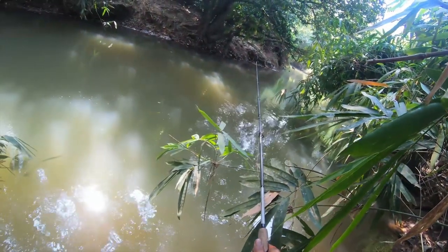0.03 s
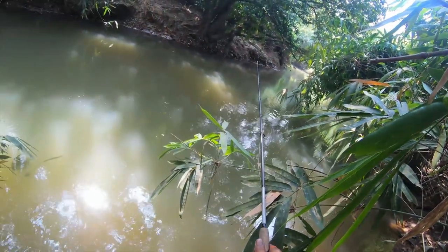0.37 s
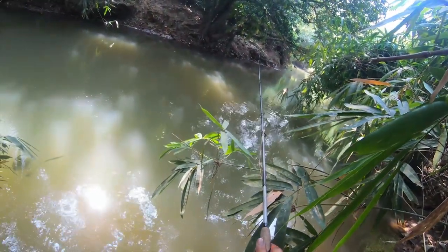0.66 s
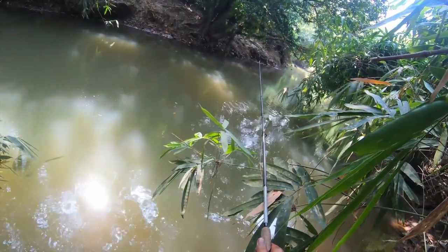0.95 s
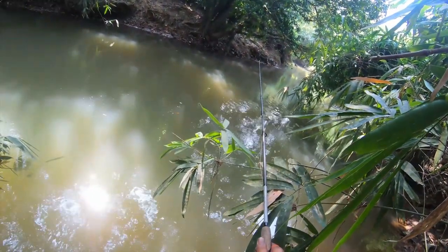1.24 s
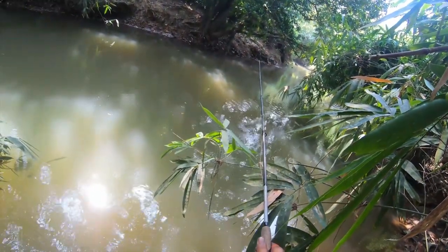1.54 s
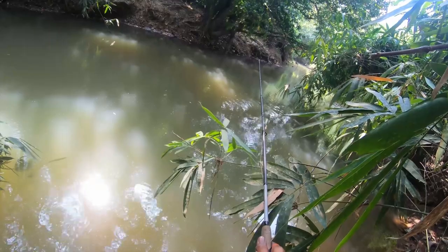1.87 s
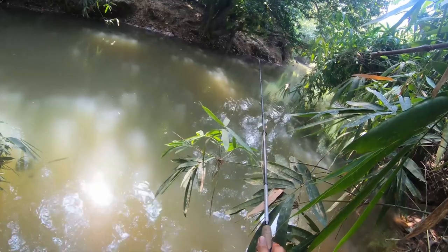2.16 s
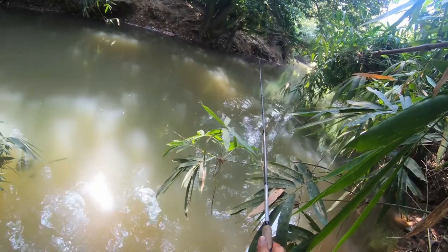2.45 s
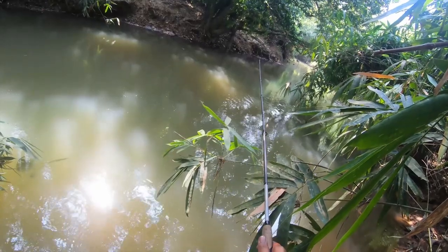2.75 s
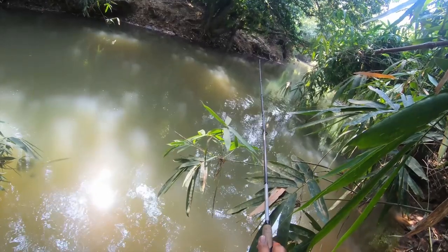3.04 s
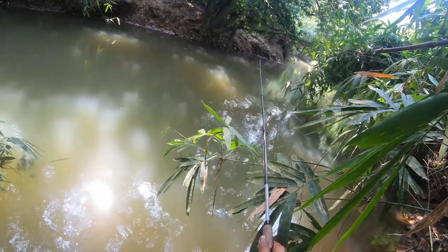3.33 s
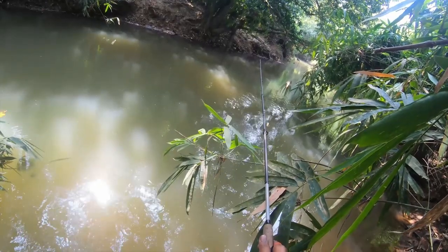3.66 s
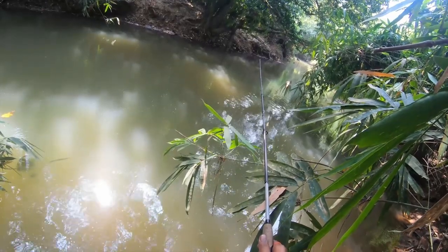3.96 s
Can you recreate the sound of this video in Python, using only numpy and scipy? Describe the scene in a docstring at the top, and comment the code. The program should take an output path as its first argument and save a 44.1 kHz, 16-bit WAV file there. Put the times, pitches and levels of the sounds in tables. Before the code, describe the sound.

Low, clear hooting from a bird comes in regular short phrases with a light outdoor echo. Behind it are a softly bubbling stream and thin far chirps; later a small bird whistles once and a leaf briefly rustles.

```python
"""A forest stream. A bird repeats a four-note hoot in nearly pure tones: two low notes, a loud held
one, a closing slur. The banks and trees throw every note back. A small bird gives one two-voiced
falling whistle, others chirp thinly far off, and a leaf rustles once. Under it all the water
washes as shaped noise and gurgles with ringing bubbles, over a low rumble of air."""
import sys
import numpy as np
from scipy import signal
from scipy.fft import rfft, irfft
from scipy.io import wavfile
from scipy.ndimage import uniform_filter1d

SR = 44100
rng = np.random.default_rng(int(sys.argv[2]) if len(sys.argv) > 2 else 0)


def generate_wav(sig):
    """Save sig (samples, or channels by samples) to the path in sys.argv[1] as 16-bit PCM at SR."""
    pcm = np.round(np.clip(np.atleast_2d(sig).T, -1, 1) * 32767).astype(np.int16)
    wavfile.write(sys.argv[1], SR, pcm)


N = 176400

# Wash spectrum. Each row: frequency in Hz, relative density in dB.
WASH_SPECTRUM = [(20, -28), (38, -16.5), (60, -6), (78, -3.5), (95, -5), (117, -15.5), (150, -2), (172, 0),
                 (215, -4), (400, -6.5), (700, -6), (950, -8), (1600, -11), (2700, -14), (4000, -19),
                 (5600, -26.5), (8500, -28), (10200, -40), (11500, -52.5)]
# Wash width. Each row: frequency in Hz, left-right correlation.
WASH_CORRELATION = [(60, .88), (150, 0.94), (280, 0.93), (540, 0.66), (1100, 0.15), (2400, .5), (5000, 0.5),
                    (10000, 0.15)]
# Wash balance. Each row: frequency in Hz, left minus right in dB.
WASH_PAN = [(60, 0), (200, 0), (330, 0), (600, 3), (1050, 7), (1900, 2.5), (3300, 1), (5800, 4),
            (10000, -4.5)]
# Rumble envelope. Each row: time in seconds, gain in dB.
RUMBLE_GAIN = [(0, 2), (0.599, -3), (1.2, -4), (1.53, 4), (1.72, -8.5), (1.88, 3), (2.15, -9), (2.45, 0),
               (2.7, -5.5), (4, -4.5)]
WASH_DB, PATCH_DB, FLICKER_DB, GUST_DB, RUMBLE_HZ = -47, 0.79, 0.35, 3.5, 113
BUBBLES_PER_S, BUBBLES_DB, BUBBLE_DECAY_CYCLES, BUBBLE_SPREAD_DB = 260, -63.5, 5.6, 3
RUSTLE_START_S, RUSTLE_DECAY_S, RUSTLE_HZ, RUSTLE_WIDTH_HZ, RUSTLE_DB = 3.656, .03, 9300, 1300, -58

# Far chirps. Each row: start in seconds, length in seconds, pitch in Hz,
# fall as a share of pitch (negative rises), level in dB.
FAR_CHIRPS = [(.46, 0.054, 7250, 0.043, -69), (.5, 0.056, 6550, 0.068, -66),
              (1.325, 0.076, 6820, 0.051, -66), (3.845, .11, 6880, -0.076, -67.5)]
# Whistle contour. Each row: time in seconds, upper voice in Hz, lower voice in Hz,
# overall gain in dB, extra gain in dB for partials involving the lower voice.
WHISTLE_CONTOUR = [(2.549, 5250, 1932, -52, -44), (2.583, 5210, 1960, -47, -13),
                   (2.617, 5190, 1950, -39, -12.5), (2.656, 5210, 1858, -43.5, 2),
                   (2.709, 5087, 1773, -38, -3.5), (2.75, 4940, 1770, -40.5, -3),
                   (2.786, 4673, 1727, -34.5, -12.5), (2.81, 4690, 1740, -47.5, -18),
                   (2.83, 4830, 1740, -66, -30)]
# Whistle partials. Each row: multiple of the upper voice, multiple of the lower voice.
WHISTLE_PARTIALS = [(1, 0), (0, 1), (0, 2), (0, 3), (1, 1), (1, 2), (2, 0)]
# Partial weights. Each entry: relative level in dB, in the same order.
PARTIAL_DB = [-1, -16, -7, -18, -6.5, -19, -33]

# Low hoots. Each row: start in seconds, length in seconds, pitch in Hz, nominal level in dB,
# fall as a share of pitch.
LOW_HOOTS = [(-.035, 0.063, 1059, -39, 0.12), (0.098, .052, 1041, -38, 0.16),
             (0.899, 0.049, 1034, -39.5, 0.13), (1.033, .048, 1034, -37.5, 0.13),
             (1.837, 0.056, 1034, -40.5, 0.042), (1.988, 0.039, 1036, -36.5, 0.16),
             (2.777, 0.035, 1035, -40.5, 0.015), (2.927, .046, 1014, -37, 0.2),
             (3.756, 0.054, 1042, -38, 0.047), (3.896, 0.053, 1034, -37, 0.14)]
# Held hoots. Each row: start in seconds, length in seconds, pitch in Hz, nominal level in dB.
HELD_HOOTS = [(0.151, 0.069, 1241, -27.5), (1.12, 0.062, 1241, -27.5), (2.06, 0.0626, 1229, -24.5),
              (3.001, .059, 1201, -25.5)]
# Closing slurs. Each row: start in seconds, length in seconds, pitch in Hz, nominal level in dB.
CLOSING_SLURS = [(0.285, 0.074, 1240, -38.5), (1.256, 0.072, 1236, -38), (2.189, 0.068, 1221, -37),
                 (3.137, 0.072, 1221, -38.5)]
ATTACK_S, RELEASE_S, OCTAVE_DB, WAVER_SHARE = .011, .012, -28.5, 0.0038

# Bank reflections. Each row: delay in seconds, left gain, right gain.
BANK_ECHOES = [(0.014, 0.23, 0.2), (0.036, 0.56, -0.3), (0.044, 0.22, 0.22), (.078, 0.11, 0.19)]
HOOT_T60_S, TREBLE_T60_S, TAIL_BUILD_S = 0.41, 0.64, 0.0035
HOOT_CORRELATION, TREBLE_CORRELATION = 0.45, .05  # left-right, of the tails
LATE_DB, LATE_T60_S = -12, 1.72  # echo from deeper in the trees
CUTOFF_HZ = 10900


def amp(db):
    """Decibels to gain."""
    return 10 ** (np.asarray(db) / 20)


def unit_rms(x):
    """Scales to rms 1."""
    return x / np.sqrt(np.mean(x ** 2) + 1e-20)


def log_interp(points, hz):
    """Reads a table on a log-frequency axis."""
    points_hz, value = np.transpose(points)
    return np.interp(np.log(hz + 1), np.log(points_hz + 1), value)


def add(mix, start_s, sound):
    """Mixes a sound in, cropped to the mix."""
    at = round(start_s * SR)
    sound = sound[max(-at, 0):]
    part = mix[max(at, 0):][:len(sound)]
    part += sound[:len(part)]


def wander(count, width=300):
    """Noise smoothed over width samples, rms about 1."""
    noise = rng.standard_normal(max(count, SR))
    return unit_rms(uniform_filter1d(uniform_filter1d(noise, width), width))[:count]


def forest(x, wet_db, t60_s, pan_db=0, correlation=HOOT_CORRELATION):
    """Direct sound, echoes off the banks, a diffuse tail from the trees. Positive pan is left."""
    t = np.arange(SR) / SR
    left, other = rng.standard_normal((2, SR))
    right = correlation * left + np.sqrt(1 - correlation ** 2) * other
    fade = amp(-60 * t / t60_s) + amp(LATE_DB - 60 * t / LATE_T60_S)
    tail = np.array([left, right]) * fade * (1 - np.exp(-t / TAIL_BUILD_S))
    paths = amp(wet_db) * tail / np.linalg.norm(tail[0])
    paths[:, 0] += 1
    for delay_s, *gains in BANK_ECHOES:
        paths[:, round(delay_s * SR)] += gains
    return signal.fftconvolve(x[None], paths, axes=1)[:, :N] * amp([[pan_db / 2], [-pan_db / 2]])


def note(length_s, hz, db, fall=0, arch=0, swell_db=0, jitter=0):
    """A tone with a faint octave. Fall, arch and jitter are shares of the pitch."""
    t = np.arange(0, length_s, 1 / SR)
    progress = t / length_s
    contour = 1 - fall * (progress - .5) + arch * (np.sin(np.pi * progress) - 2 / np.pi)
    waver = WAVER_SHARE * wander(len(t)) + jitter * wander(len(t), width=150)
    phase = 2 * np.pi * np.cumsum(hz * (contour + waver)) / SR
    ramp = np.clip(np.minimum(t / ATTACK_S, (length_s - t) / RELEASE_S), 0, 1)
    envelope = np.sin(np.pi / 2 * ramp) ** 2 * amp(db + swell_db * (progress - 1.5))
    return np.sqrt(2) * envelope * (np.sin(phase) + amp(OCTAVE_DB) * np.sin(2 * phase))


def stream():
    """Water noise with drifting spectral patches; its bass swells and sinks as a rumble of air."""
    frames, hz = N // 1024 + 5, np.fft.rfftfreq(4096, 1 / SR)
    left_re, left_im, other_re, other_im, patches = rng.standard_normal((5, frames, len(hz)))
    patches = unit_rms(uniform_filter1d(uniform_filter1d(patches, size=3, axis=0), size=32, axis=1))
    correlation = log_interp(WASH_CORRELATION, hz)
    left = left_re + 1j * left_im
    right = correlation * left + np.sqrt(1 - correlation ** 2) * (other_re + 1j * other_im)
    pan = amp(log_interp(WASH_PAN, hz) / 2)
    spectra = np.array([left * pan, right / pan]) * amp(log_interp(WASH_SPECTRUM, hz) + PATCH_DB * patches)
    _, wash = signal.istft(spectra.transpose(0, 2, 1), nperseg=4096, noverlap=3072)
    wash = amp(WASH_DB) * unit_rms(wash[:, :N])
    bass = irfft(rfft(wash) / (1 + (np.fft.rfftfreq(N, 1 / SR) / RUMBLE_HZ) ** 8), N)
    bass_db = np.interp(np.arange(N) / SR, *np.transpose(RUMBLE_GAIN)) + GUST_DB * wander(N, width=2500)
    return (wash - bass) * amp(FLICKER_DB * wander(N, width=2000)) + bass * amp(bass_db)


def bubbles():
    """Small bubbles ring briefly, rising in pitch, where the water ripples."""
    t, out = np.arange(3000) / SR, np.zeros((2, N))
    pitches_hz = np.geomspace(380, 3600, 30)
    for hz in pitches_hz:
        age = t * hz / BUBBLE_DECAY_CYCLES
        envelope = np.exp(-age) * (1 - np.exp(-t * hz)) / hz ** 0.12
        ring = envelope * np.sin(2 * np.pi * hz * t * (1 + 0.024 * age))
        strength = amp(BUBBLE_SPREAD_DB * np.minimum(rng.exponential(1, N), 4))
        onsets = rng.random(N) < BUBBLES_PER_S / len(pitches_hz) / SR
        pan_db = 1 + 4 * rng.standard_normal(N)  # ripples lie to the left
        out += signal.oaconvolve(strength * onsets * amp([pan_db, -pan_db]), ring[None], axes=1)[:, :N]
    return amp(BUBBLES_DB) * unit_rms(out)


def leaf():
    """One brush of a leaf: a short burst of bright noise."""
    band = np.exp(-.5 * ((np.fft.rfftfreq(N, 1 / SR) - RUSTLE_HZ) / RUSTLE_WIDTH_HZ) ** 2)
    hiss = unit_rms(irfft(rfft(rng.standard_normal((2, N))) * band, N))
    age_s = np.maximum(np.arange(N) / SR - RUSTLE_START_S, 0)
    return amp(RUSTLE_DB) * hiss * np.minimum(age_s / .004, 1) * np.exp(-age_s / RUSTLE_DECAY_S)


def far_birds():
    """Thin, high gliding chirps among the trees."""
    out = np.zeros(N)
    for start_s, length_s, hz, fall, db in FAR_CHIRPS:
        add(out, start_s, note(length_s, hz, db, fall))
    return forest(out, wet_db=4.5, t60_s=TREBLE_T60_S, pan_db=3, correlation=TREBLE_CORRELATION)


def whistling_bird():
    """Two voices sound together and make sum tones as they fall."""
    times_s, upper_hz, lower_hz, gain_db, lower_db = np.transpose(WHISTLE_CONTOUR)
    t = np.arange(times_s[0], times_s[-1], 1 / SR)
    upper_hz = np.interp(t, times_s, upper_hz) * (1 + 0.0072 * wander(len(t), width=80))
    lower_hz = np.interp(t, times_s, lower_hz) * (1 + 0.026 * wander(len(t), width=80))
    upper_phase, lower_phase = 2 * np.pi * np.cumsum([upper_hz, lower_hz], axis=1) / SR
    lower_gain = amp(np.interp(t, times_s, lower_db))
    voice = sum(amp(db) * (lower_gain if k else 1) * np.sin(j * upper_phase + k * lower_phase)
                for (j, k), db in zip(WHISTLE_PARTIALS, PARTIAL_DB))
    envelope = amp(np.interp(t, times_s, gain_db)) * np.minimum((t - t[0]) / ATTACK_S, 1)
    out = np.zeros(N)
    add(out, t[0], voice * envelope)
    return forest(out, wet_db=5, t60_s=TREBLE_T60_S, correlation=TREBLE_CORRELATION)


def hooting_bird():
    """Phrases of swelling tones: two low notes, a held note, a closing slur."""
    low, held, slur = np.zeros((3, N))
    for start_s, *row in LOW_HOOTS:
        add(low, start_s, note(*row, arch=0.045, swell_db=6.5, jitter=0.017))
    for start_s, *row in HELD_HOOTS:
        add(held, start_s, note(*row, arch=.004, swell_db=6))
    for start_s, *row in CLOSING_SLURS:
        add(slur, start_s, note(*row, fall=0.099, arch=0.14, swell_db=5, jitter=.02))
    return (forest(low, wet_db=4, t60_s=HOOT_T60_S, pan_db=5.5)
            + forest(held, wet_db=-7, t60_s=HOOT_T60_S, pan_db=-2.5)
            + forest(slur, wet_db=7.5, t60_s=HOOT_T60_S, pan_db=0.5))


def scene():
    """Birds, leaf and water, in stereo."""
    return hooting_bird() + whistling_bird() + far_birds() + leaf() + stream() + bubbles()


def record(dry):
    """Steep low-pass."""
    taps = signal.firwin(255, CUTOFF_HZ, window=("kaiser", 9), fs=SR)
    return signal.oaconvolve(dry, taps[None], "same")


dry = scene()
out = record(dry)
generate_wav(out)
```